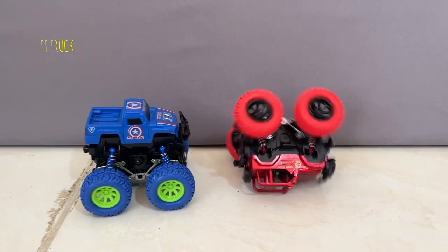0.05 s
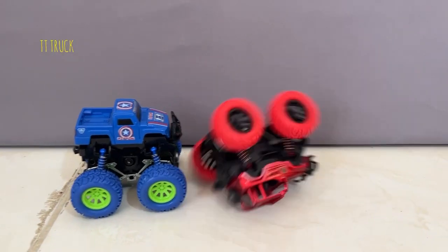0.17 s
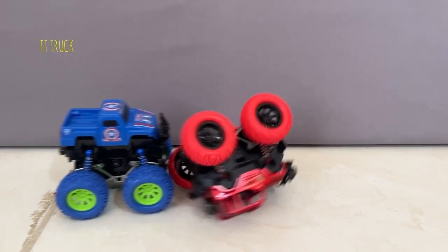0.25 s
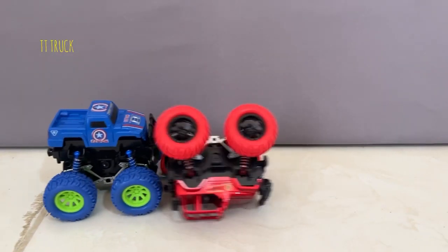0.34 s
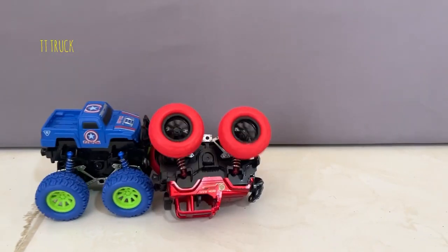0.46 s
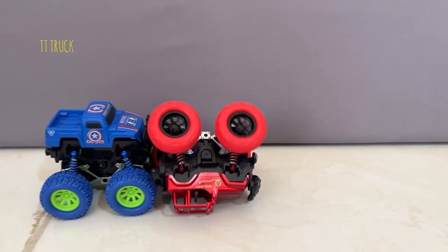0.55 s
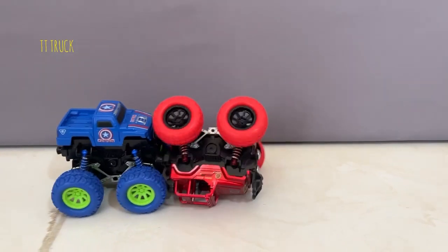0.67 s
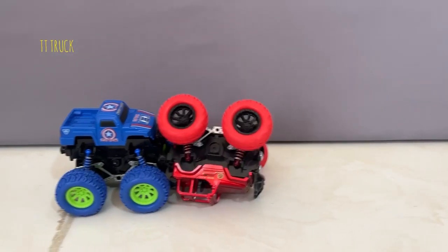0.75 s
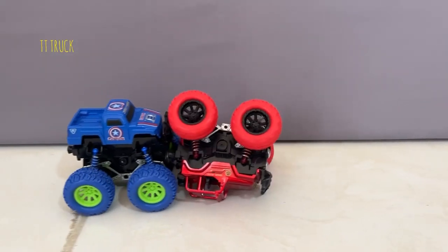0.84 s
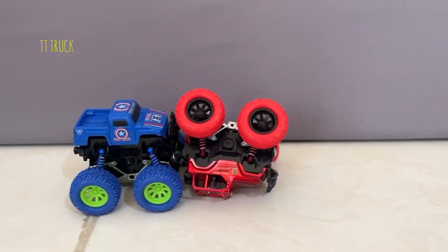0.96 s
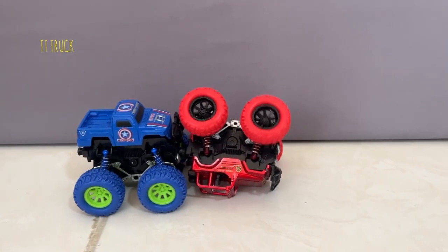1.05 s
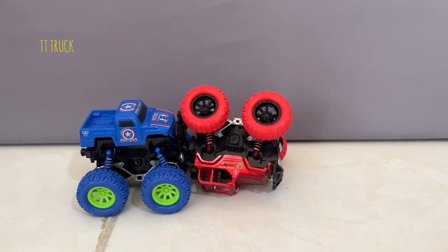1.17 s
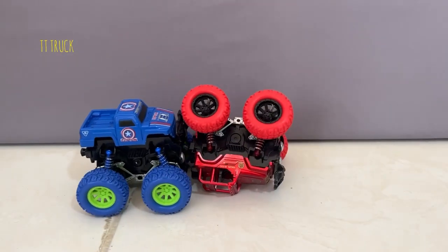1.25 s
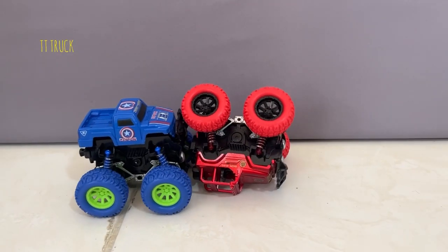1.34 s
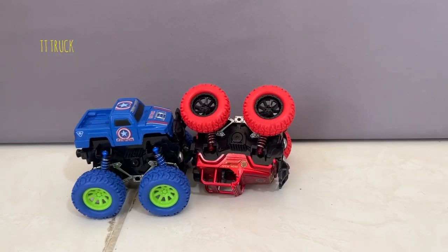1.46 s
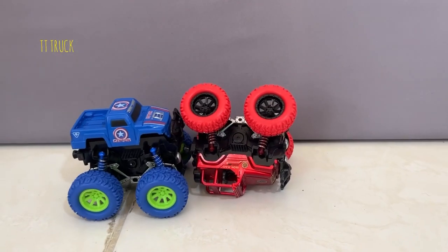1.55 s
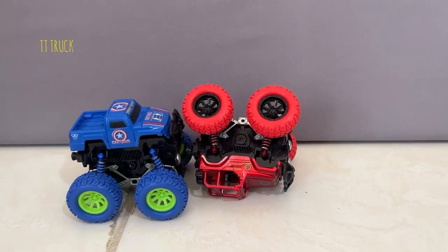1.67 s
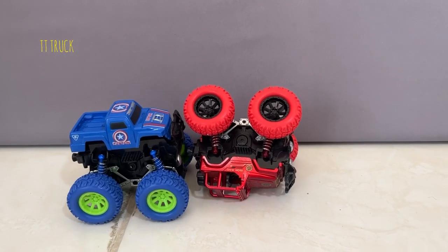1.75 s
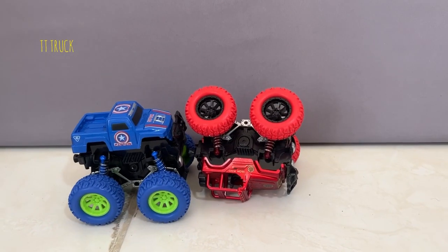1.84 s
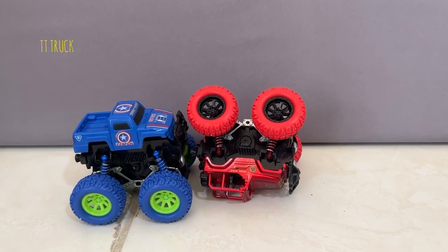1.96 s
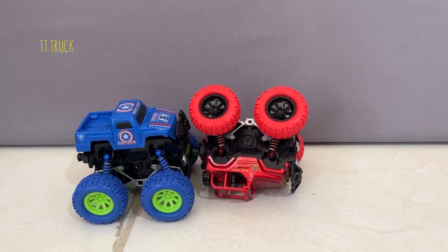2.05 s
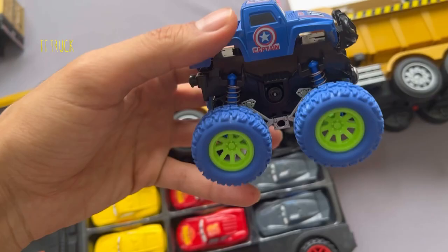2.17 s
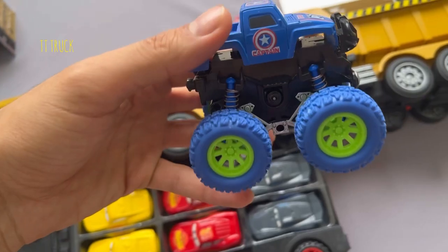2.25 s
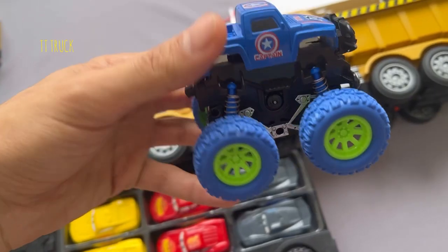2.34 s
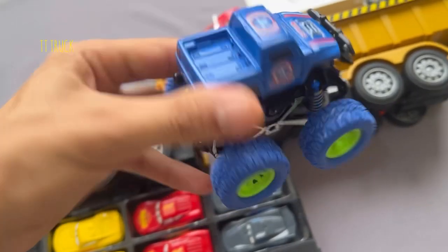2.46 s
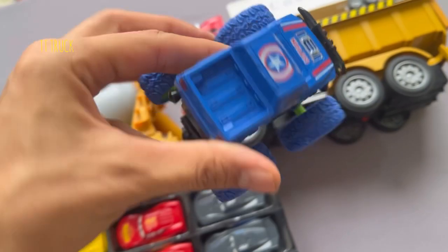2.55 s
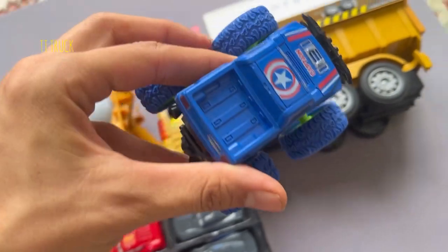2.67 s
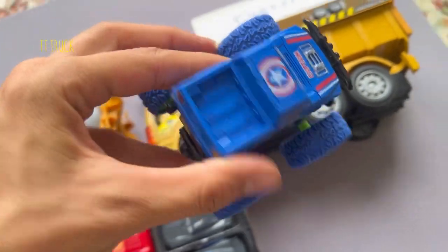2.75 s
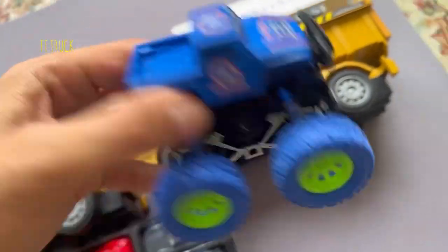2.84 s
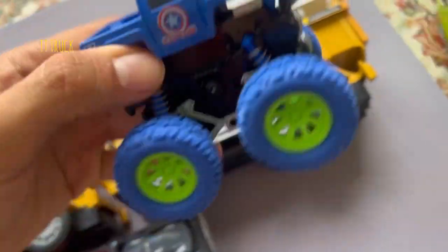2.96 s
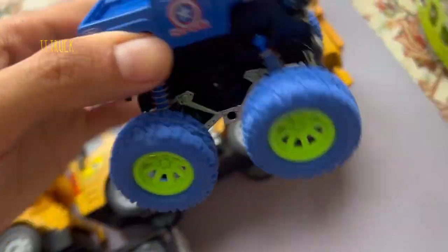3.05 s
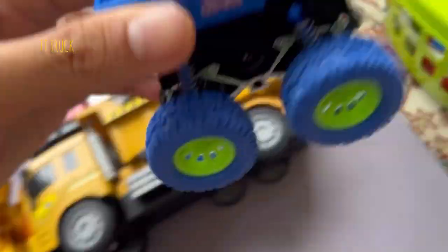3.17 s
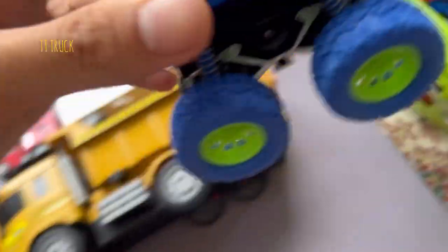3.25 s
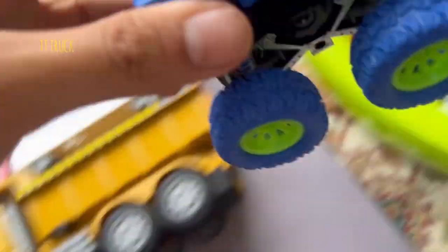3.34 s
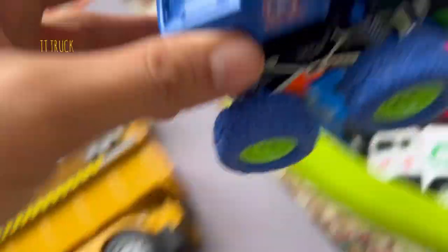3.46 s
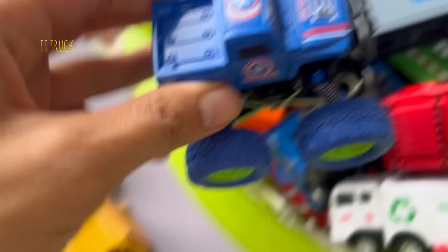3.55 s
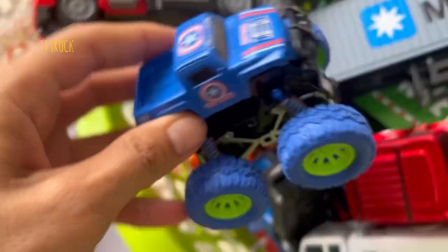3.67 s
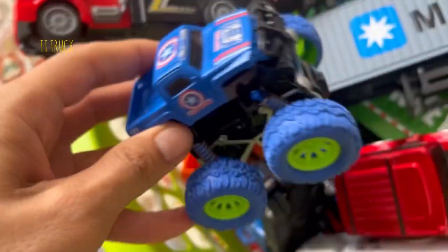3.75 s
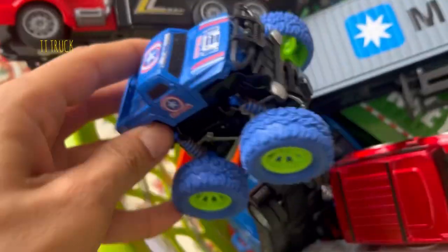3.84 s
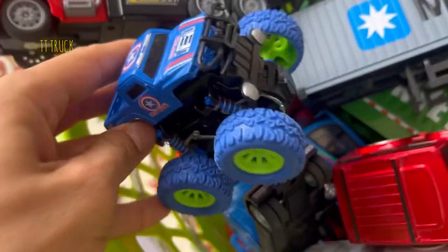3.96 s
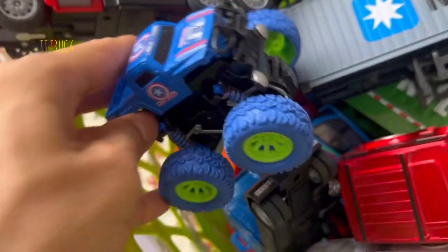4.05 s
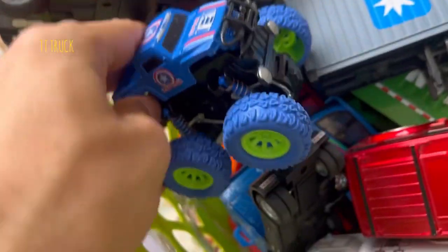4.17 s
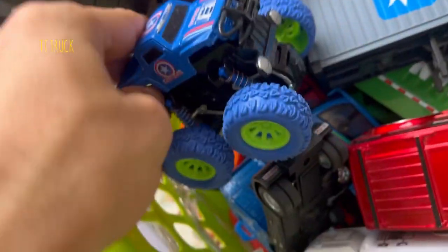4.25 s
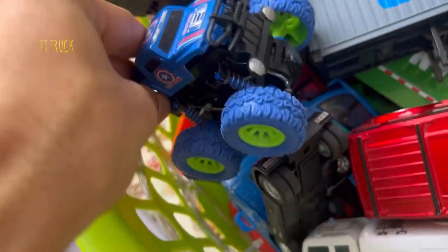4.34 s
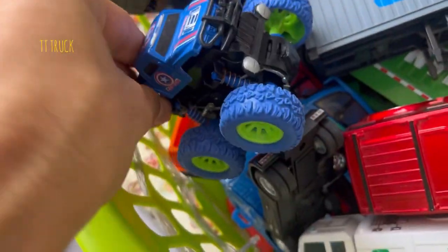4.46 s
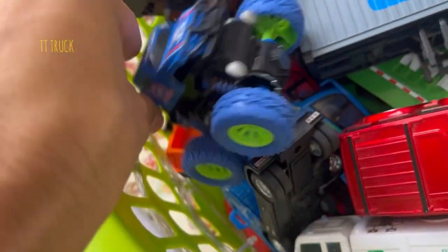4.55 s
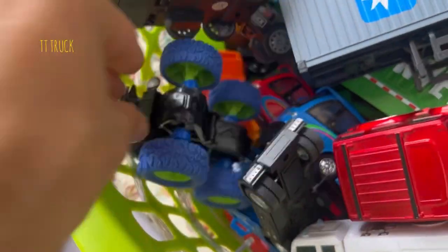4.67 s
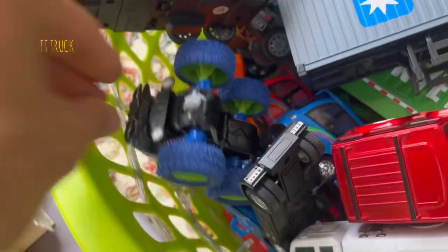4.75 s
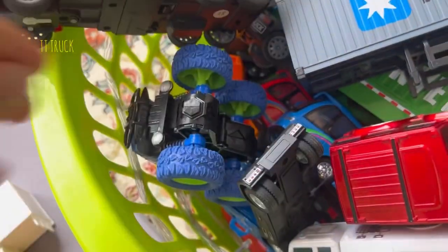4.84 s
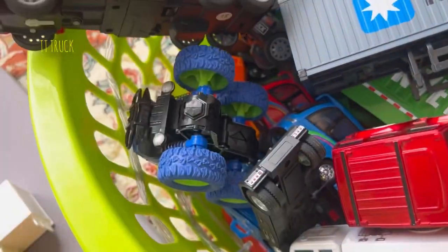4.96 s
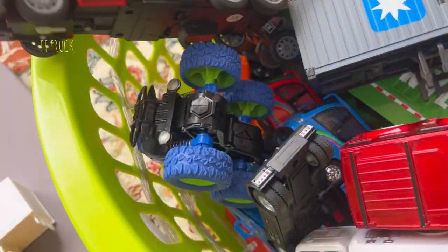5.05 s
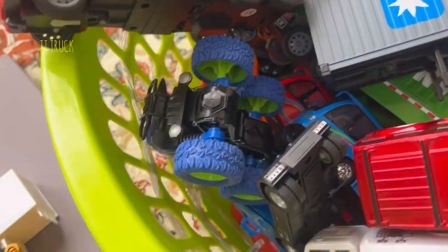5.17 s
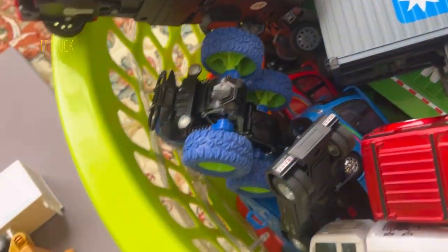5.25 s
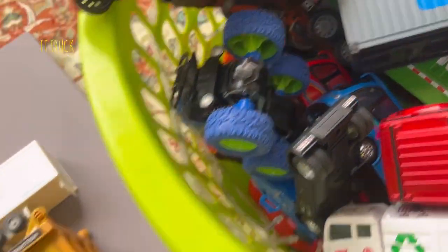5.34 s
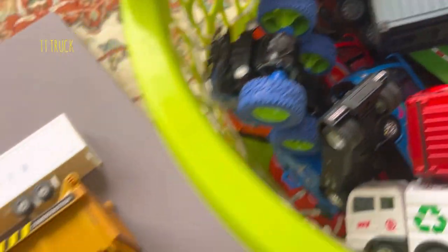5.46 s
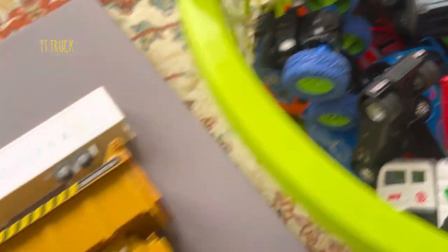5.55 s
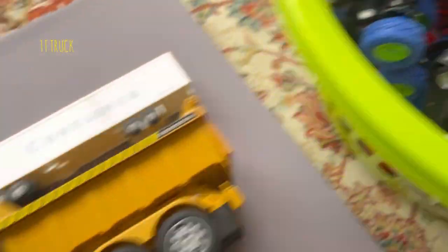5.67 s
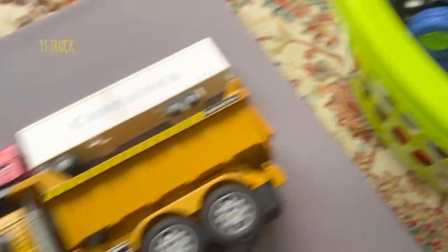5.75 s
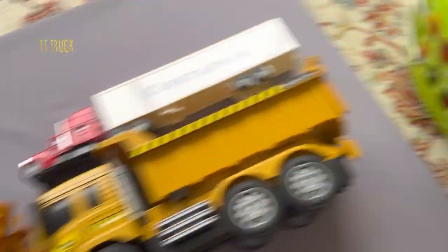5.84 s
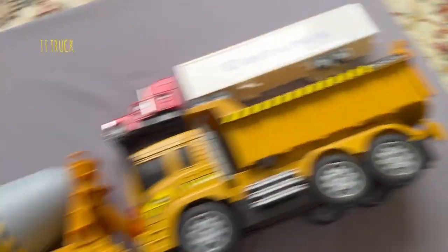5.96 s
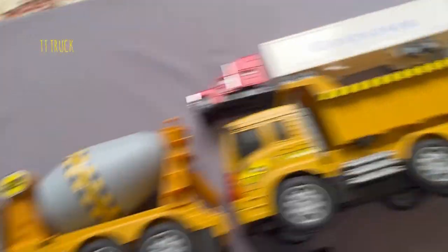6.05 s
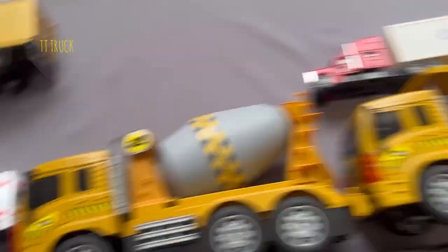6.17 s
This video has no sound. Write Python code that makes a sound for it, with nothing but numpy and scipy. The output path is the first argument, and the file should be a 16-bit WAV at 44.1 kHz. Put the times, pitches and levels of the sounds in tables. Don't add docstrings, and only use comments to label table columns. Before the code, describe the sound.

Close up in a humming tiled room, a plastic toy car lands hard on its roof, knocks about and rattles with loose flywheel gears that slow into tiny ticks. Abruptly the background becomes quieter; a hand rubs and clicks another toy car, then drops it with a hollow double clatter into a basket of toys.

```python
import sys
import numpy as np
from scipy import signal
from scipy.fft import rfft, irfft
from scipy.io import wavfile

SR = 44100
rng = np.random.default_rng(int(sys.argv[2]) if len(sys.argv) > 2 else 0)


def volts(x):
    e = np.asarray(x, float) / 20
    return 10 ** e


def dump_mix(stems):
    frames = np.atleast_2d(stems).T
    limited = np.clip(frames, -1, 1)
    pcm = np.round(limited * 32767).astype(np.int16)
    wavfile.write(sys.argv[1], SR, pcm)


N = 273772


def rms_one(x):
    return x / np.sqrt(np.mean(x ** 2) + 1e-20)


def in_time(rows):
    s, *columns = np.transpose(rows)
    t = np.arange(N) / SR
    opening = (t - s[0] + 0.012) / .003
    closing = (s[-1] + 0.035 - t) / .02
    gate = np.clip(np.minimum(opening, closing), 0, 1)
    nearer = np.minimum(t - s[0] + 0.012, s[-1] + 0.035 - t)
    gate = np.clip(nearer / [[.003], [.02]], 0, 1).min(axis=0)
    return [np.interp(t, s, c) for c in columns] + [gate]


def at_hz(points, hz, order=1):
    table = np.array(points)
    return np.interp(np.log(hz + 1), np.log(table[:, 0]), table[:, order])


def drift(rate_hz):
    r = np.exp(-64 * np.pi * rate_hz / SR)
    slow = signal.lfilter([1], [1, -2 * r, r * r], rng.standard_normal(N // 32 + 1002))[1000:]
    return np.interp(np.arange(N) / 32, np.arange(len(slow)), rms_one(slow))


def resonate(x, peaks, patchy_db=0):
    out = 0
    for k, (hz, width_hz, db) in enumerate(peaks):
        r = np.exp(-np.pi * width_hz / SR)
        if patchy_db:
            db = db + patchy_db * drift(27)
        zeros = [(1 - r * r) / 2, 0, (r * r - 1) / 2]
        poles = [1, -2 * r * np.cos(2 * np.pi * hz / SR), r * r]
        out = out + (-1) ** k * signal.lfilter(zeros, poles, x * volts(db) + 1e-18)
    return out


def band(x, low_hz, high_hz):
    return signal.sosfilt(signal.butter(2, [low_hz, high_hz], "band", fs=SR, output="sos"), x)


def grains(per_s, spread_db):
    chance, size, sign = rng.random((3, N))
    size_db = spread_db * np.minimum(-np.log(size + 1e-9), 3.0)
    return (chance < per_s / SR) * volts(size_db) * np.sign(sign - .5)


def gears():
    # time_s, level_db, lower_shell_db
    shake = [(0.0, -39, -4), (.08, -40, -4), (.095, -30, -5), (.2, -34, -5), (.272, -38, -4),
             (.302, -27, 2), (.33, -33, 1), (.39, -31, 3), (.5, -32, 2), (.64, -34, 1), (.77, -33, 0),
             (.97, -38.5, 0), (1.05, -43, -3), (1.15, -45, -4), (1.22, -49, -8), (1.32, -55, -8),
             (1.4, -63, -6), (1.54, -76, -4)]
    # catch_again_s, lifted_for_s, change_db
    slips = [(0.086, 0.024, -6.5), (0.359, 0.048, -5.5), (.43, 0.053, -2.5), (.488, 0.014, -2.5),
             (0.538, 0.024, -12), (0.579, 0.021, -2.5), (.618, .015, -1.5), (.714, 0.054, -11),
             (0.756, 0.029, -4.5), (.822, .015, -4), (0.869, 0.033, -9), (.935, 0.012, -3),
             (1.017, 0.03, -1.5), (1.055, 0.02, -1.5), (1.109, 0.027, 1), (1.19, 0.028, 0.5),
             (1.247, .015, 0)]
    # pitch_hz, width_hz, level_db
    cabin_peaks = [(563, 680, -8), (1070, 220, 0.5), (1398, 220, -4)]
    body_peaks = [(1830, 300, -3.5), (2150, 340, -0.5)]
    upper_peaks = [(2440, 200, -2), (2790, 190, 1.5), (2920, 190, -1), (3730, 1200, -9.5)]
    bright_peaks = [(4300, 730, 0.5), (5500, 320, -7), (6390, 820, 3.5), (8950, 11000, -6),
                    (10850, 2900, -2), (11900, 2700, -1), (15800, 900, -10)]
    shake_db, lower_db, gate = in_time(shake)
    t, lost_db = np.arange(N) / SR, 0
    for s, lifted, db in slips:
        corners = [s - 0.97 * lifted, s - 0.5 * lifted, s - .003, s]
        lost_db = lost_db + np.interp(t, corners, [0, db, db, 0])
    clumps = volts(1.1 * drift(90))
    rattle = clumps * grains(1500, 2.6)
    cabin = rms_one(resonate(rattle, cabin_peaks, patchy_db=2.5))
    body = rms_one(resonate(rattle, body_peaks, patchy_db=1.4))
    upper = rms_one(resonate(rattle, upper_peaks, patchy_db=1.15))
    bright = rms_one(resonate(clumps * grains(3000, 1.5), bright_peaks, patchy_db=2.15))
    jolt_db = np.maximum(shake_db + 28.5, 0)
    bright_db = 6 - 6.5 * t - 0.94 * jolt_db + 0.44 * lost_db
    shells = volts(-9) * cabin + volts(lower_db) * body + volts(-1.5 - 0.6 * lower_db) * upper
    return gate * volts(shake_db + lost_db) * (shells + volts(bright_db) * bright)


def dying_noise(t60, count, size):
    t = np.arange(size) / SR
    fading = rng.standard_normal((count, 2, size)) * volts(-60 * t / t60) * (t > .0005)
    tail = band(fading, 590, 6550)
    return tail / np.sqrt(np.sum(tail ** 2, axis=-1, keepdims=True))


def room(x):
    hop = 4096
    count = N // hop + 2
    padded, near = np.pad(x, (hop, 3 * hop)), np.zeros((2, (count + 3) * hop))
    window = np.sin(np.pi * np.arange(2 * hop) / (2 * hop))
    for k, echo in enumerate(dying_noise(0.011, count=count, size=hop // 2)):
        piece = padded[k * hop:][:2 * hop] * window
        near[:, k * hop:][:, :5 * hop // 2 - 1] += signal.fftconvolve(piece[None], echo, axes=1)
    walls = signal.fftconvolve(x[None], dying_noise(0.25, count=1, size=SR // 2)[0], axes=1)
    return volts(-9) * near[:, hop:hop + N] + volts(-11.5) * walls[:, :N]


def room_tone(spectrum):
    # pitch_hz, likeness (0-1)
    port_likeness = [(60, 0.97), (300, .85), (700, 0.01), (1500, 0.3), (3500, .5), (6000, 0), (9000, 1),
                     (15000, 1)]
    hz = np.fft.rfftfreq(N, 1 / SR)
    mid, side = rfft(rng.standard_normal((2, N))) * volts(at_hz(spectrum, hz))
    alike = np.clip(at_hz(port_likeness, hz), 0, 1)
    both = np.sqrt(1 + alike) * mid + np.sqrt(1 - alike) * side * [[1], [-1]]
    share = 1 / (1 + (hz / 220) ** 4)
    low, rest = irfft(both * share, N), irfft(both * (1 - share), N)
    return np.array([low, rest]) / np.std(low + rest)


def backgrounds():
    # pitch_hz, level_db (per Hz)
    tiled_spectrum = [(25, -25.5), (48, 6.5), (100, -2), (250, -4.5), (480, -18.5), (750, -31), (1400, -33),
                      (2100, -30.5), (3300, -36), (4700, -44), (6400, -35.5), (7500, -48), (10000, -53.5),
                      (15000, -51)]
    soft_spectrum = [(25, -18), (42, -12), (57, 10), (75, -3.5), (115, -4.5), (250, -21), (500, -28),
                     (1200, -36), (2000, -29), (3500, -32), (7000, -41), (9800, -45.5), (11500, -38),
                     (15500, -49.5)]
    # time_s, level_db above the
    stir = [(2.29, -2.5), (2.7, 0), (3.2, 6.5), (3.6, 1.5), (4.05, 0.5), (4.3, 10), (4.4, 4.5), (4.6, 2),
            (4.67, 22.5), (4.76, 8.5), (4.92, 4), (5.07, 6.5), (5.4, -1.5), (5.47, -1.5), (5.7, 0.5),
            (6.21, 1)]
    scene_change_s = 2.286
    hiss_hz, hiss_width_hz, hiss_db = 15680, 130, -87.5
    tiled = volts(-46.5) * room_tone(tiled_spectrum).sum(axis=0)
    white = rng.standard_normal((2, N))
    hiss = band(white, hiss_hz - hiss_width_hz / 2, hiss_hz + hiss_width_hz / 2)
    tiled = tiled + volts(hiss_db) * rms_one(hiss)
    low, rest = room_tone(soft_spectrum)
    stir_db, _ = in_time(stir)
    soft = volts(-63.5 + 0.98 * stir_db) * low + volts(-60 + stir_db) * rest
    return np.where(np.arange(N) < scene_change_s * SR, tiled, soft)


def thuds(blows, modes):
    out = np.zeros(N)
    for s, blow_db in blows:
        at = round(s * SR)
        t = np.arange(N - at)[:SR] / SR
        for hz, db, t60 in modes:
            out[at:][:SR] += volts(blow_db + db - 60 * t / t60) * np.sin(2 * np.pi * hz * t)
    return out


def snaps():
    # start_s, peak_db, pitch_hz, die_away_s (by 60 dB)
    touches = [(.009, -22.5, 2450, 0.017), (0.045, -20, 2700, .012), (.091, -21.5, 240, 0.045),
               (0.36, -18, 2300, .006), (.365, -18.5, 7100, .005), (0.38, -17.5, 3300, .006),
               (.452, -21.5, 1900, .006), (0.5, -20, 2300, 0.012), (.5405, -18.5, 2300, 0.018),
               (2.4373, -53, 1770, 0.027), (2.866, -46, 1500, 0.12), (3.1313, -33, 2100, 0.015),
               (3.154, -24, 3300, 0.0034), (3.6949, -47, 2330, 0.021), (3.6965, -35, 4500, .005),
               (3.6972, -44, 2000, 0.0071), (3.6966, -37.5, 7000, .004), (4.568, -42, 870, .03),
               (5.081, -43, 1000, .02), (2.905, -55, 530, .03), (2.3, -48.5, 2480, .015),
               (2.438, -49, 2800, 0.0046), (4.3, -38, 2600, .05), (4.191, -46, 5000, .01),
               (3.262, -55, 800, .04), (3.018, -48, 1900, .012), (3.033, -48, 2100, .012),
               (3.047, -50, 2000, .012), (3.003, -52, 1800, .012), (0.869, -22, 4500, .008),
               (4.632, -19.5, 1600, 0.013), (4.671, -24.5, 305, .06), (4.6837, -29.5, 410, 0.057),
               (4.744, -40, 370, .06), (4.7745, -41.5, 360, .06), (5.012, -42, 680, .025),
               (5.018, -42.5, 900, .035), (5.069, -46, 300, 0.064), (5.1095, -34, 1110, 0.013)]
    return sum(thuds([(s, db)], [(hz, 0, t60)]) for s, db, hz, t60 in touches)


def knocks(events, t60, hollow_db, ring_db, crack_db, rise):
    size = 4096
    out, t = np.zeros(N + size), np.arange(size) / SR

    def fade(time):
        return (1 - np.exp(-t / (rise * t60))) * volts(-60 * t / max(time, .003))

    noise = rng.standard_normal((len(events), 4, size))
    for (s, db, hz, high_db), white in zip(events, noise):
        hollow = band(white[0] * fade(2.8 * t60), 210, 1550)
        middle = band(white[1] * fade(t60), 1500, 4500)
        high = band(white[2] * fade(0.61 * t60), 6800, 16000)
        ring = resonate(white[3] * fade(.7 * t60), [(hz, 4e-5 * hz ** 2 + 220, 0)])
        crack = band(white[1] * volts(-60 * t / 0.001), 1900, 12000)
        gains = volts([hollow_db + 0.1 * high_db, -5, high_db, ring_db, crack_db + 3 * high_db])
        parts = [hollow, middle, high, ring, crack]
        at = round(s * SR)
        out[at:at + size] += volts(db) * sum(g * p / np.abs(p).max() for g, p in zip(gains, parts))
    return out[:N]


def tumbling():
    # start_s, peak_db, ring_hz, high_part_db (hardness)
    tumble_hits = [(.027, -22.5, 2330, -13.5), (.04, -22.5, 4300, -14), (.061, -16, 2460, -9.5),
                   (.0862, -7.5, 3040, 1), (.09, -13, 1088, -23.5), (.101, -12.5, 3050, -17),
                   (.133, -14, 1275, -10.5), (.296, -14.5, 2120, 3), (.303, -20.5, 2240, -12),
                   (.36, -19.5, 2300, 5), (.384, -17, 2150, -11), (.458, -21.5, 2475, -18),
                   (.494, -15.5, 2440, -7.5), (.539, -17, 2200, -13), (.686, -24.5, 2150, -14.5),
                   (.722, -18, 2330, -13.5), (.757, -21.5, 2334, -24), (.775, -19, 1050, -2.5),
                   (.87, -20, 1972, -2), (.949, -32, 1053, -11), (1.017, -31, 2600, 1),
                   (1.055, -29, 2230, -27), (1.119, -30, 2550, -25), (1.146, -35, 2470, -31),
                   (1.247, -30, 2780, -24)]
    return knocks(tumble_hits, t60=.025, hollow_db=-15, ring_db=-4.5, crack_db=-11, rise=0.019)


def landing():
    # start_s, level_db
    floor_blows = [
        (.0865, -19.5),
    ]
    # pitch_hz, level_db, die_away_s (by 60 dB)
    floor_modes = [(77.14, -3.5, 0.49), (133.2, -8, 0.65), (159, -3.5, 0.11), (193, 3, 0.18),
                   (264, -8, 0.27), (307, -16.5, 0.5)]
    return band(thuds(floor_blows, floor_modes), 52, 3000)


def ratchet():
    # start_s, peak_db
    tooth_ticks = [(1.3114, -40), (1.3264, -41), (1.3404, -38), (1.3564, -42), (1.3724, -43), (1.3877, -43),
                   (1.4034, -42), (1.4192, -43), (1.4351, -42), (1.4506, -39), (1.4666, -40), (1.484, -43),
                   (1.5005, -44), (1.5174, -44), (1.5369, -49), (1.5554, -48), (1.5758, -47), (1.5963, -46),
                   (1.6194, -56), (1.6437, -57), (1.6746, -56)]
    # pitch_hz, width_hz, level_db
    tooth_peaks = [(2050, 420, -2), (2720, 450, 0), (4400, 600, -7), (6500, 1200, -13)]

    def ring(x):
        return sum(resonate(resonate(x, [peak]), [peak]) * (-1) ** k for k, peak in enumerate(tooth_peaks))

    teeth = np.zeros(N)
    for s, db in tooth_ticks:
        touches = np.array([1, *rng.uniform(-.6, .6, 2)])
        teeth[round(s * SR) + np.array([0, 45, 110])] = volts(db) * touches
    one_tick = ring(np.eye(1, 512)[0])
    return ring(teeth) / np.abs(one_tick).max()


def rubbing():
    # start_s, length_s, level_db, dull_db, bright_db (both above level_db)
    strokes = [(2.415, 0.093, -69.5, -22, -10.5), (2.54, 0.032, -67.5, -13, -15),
               (2.775, 0.032, -66, -15, -20), (2.823, 0.053, -63, -11, 4), (2.942, 0.17, -60, -18, -4),
               (3.24, 0.2, -65, -1, 2.5), (4.111, 0.033, -63.5, 18.5, -24), (4.185, 0.043, -70.5, 13.5, -7),
               (4.27, 0.032, -57, -1.5, 1.5), (4.4, 0.1206, -70.5, -14, -4), (4.535, 0.1, -66, 11, 2.5),
               (5.005, 0.04, -66, 10, -10)]
    settles = [
        (2.6, 0.32, -70, -6, -5.5),
        (3.8, 0.092, -70, -14, 3),
        (4.31, 0.052, -49.5, 5, -6),
        (4.69, 0.15, -41, 3.5, 1.5),
        (5.07, 0.13, -55.5, 3.5, -19),
    ]
    # pitch_hz, width_hz, level_db
    rub_peaks = [(1500, 550, -1.5), (2300, 480, 2), (3233, 370, -1)]
    dull_peaks = [(356, 250, -4.5), (746, 680, -6.5), (1100, 270, -5)]
    bright_peaks = [(5600, 1400, 2), (6600, 1200, 3), (7630, 660, 1.5), (10050, 1800, -1),
                    (13100, 4800, -7)]
    flutter = volts(0.66 * drift(61))
    slips = rms_one(resonate(flutter * grains(2200, 3.6), rub_peaks, patchy_db=4.0))
    dull = rms_one(resonate(grains(2000, 2.1), dull_peaks, patchy_db=1.0))
    bright = rms_one(resonate(flutter * grains(7100, 2.1), bright_peaks, patchy_db=3.5))
    moves = [(*row, -2) for row in strokes] + [(*row, -27.5) for row in settles]
    out = 0
    for s, length, db, dull_db, bright_db, sag_db in moves:
        press_db, gate = in_time([(s, db), (s + length, db + sag_db)])
        mix = slips + volts(dull_db) * dull + volts(bright_db) * bright
        out = out + gate * volts(press_db - 2.5) * mix
    return out


def turning():
    # start_s, peak_db, ring_hz, high_part_db (hardness)
    turning_hits = [(2.4371, -46, 1720, -20), (2.55, -48.5, 2400, -28), (2.6542, -55, 2410, -35),
                    (2.7734, -51.5, 1796, -17), (2.829, -48, 1570, -4), (2.8425, -43, 1830, -14),
                    (2.8662, -36, 5600, -15), (2.937, -55, 5600, -13), (2.9724, -35.5, 6100, -10),
                    (3.0175, -44.5, 2020, -21), (3.1305, -42, 3000, -22), (3.1545, -35, 1500, 0),
                    (3.2594, -47.5, 831, -2), (3.5765, -47, 3800, -4), (3.6125, -53, 2120, -16),
                    (3.6475, -49, 5700, 0), (3.6965, -38.5, 2000, 2), (3.84, -58.5, 2250, -20),
                    (3.9523, -45, 2253, 0), (3.9636, -46.5, 1500, -6), (5.9294, -61, 2130, -0.5)]
    return knocks(turning_hits, t60=0.017, hollow_db=-28.0, ring_db=-4, crack_db=-10, rise=0.1)


def squeaks():
    # start_s, end_s, pitch_hz, width_hz, level_db
    squeak_events = [(2.855, 2.93, 5700, 400, -64), (2.935, 3.0, 5500, 900, -62),
                     (3.06, 3.12, 5300, 700, -62), (3.29, 3.5, 1175, 150, -72), (3.45, 3.6, 1190, 150, -77),
                     (3.36, 3.48, 2370, 200, -77), (3.64, 3.7, 1500, 150, -72), (2.65, 3.1, 450, 300, -72),
                     (5.93, 6.3, 400, 220, -76), (4.85, 5.09, 2420, 50, -76), (4.91, 4.99, 2420, 50, -74),
                     (4.95, 5.12, 4650, 180, -77), (5.9, 5.97, 6000, 2500, -80)]
    t, out = np.arange(N) / SR, 0
    for start, end, hz, width_hz, db in squeak_events:
        peak = [(hz, width_hz, 0)]
        line = resonate(resonate(rng.standard_normal(N), peak), peak)
        fade = np.interp(t, [start, start + 0.01, end - .045, end], [0, 1, 1, 0])
        out = out + volts(db) * rms_one(line) * fade
    return out


def lowering():
    # start_s, peak_db, ring_hz, high_part_db (hardness)
    lowering_hits = [(4.1037, -42, 1070, -26.5), (4.1344, -45, 1070, -24.5), (4.1833, -40.5, 5000, -2),
                     (4.2091, -44, 1109, -17), (4.2405, -42.5, 3160, 4), (4.2656, -32, 2970, 1.5),
                     (4.2986, -27.5, 1610, 6.5), (4.44, -55, 2038, -19), (4.4538, -54, 1930, -27.5),
                     (4.5371, -51.5, 990, 6.5), (4.568, -45, 970, -11.5), (4.592, -35, 1680, 6.5),
                     (4.737, -31.5, 1160, -7), (4.808, -41.5, 4100, -6), (5.0115, -49, 1900, -30),
                     (5.069, -39, 5140, -4), (5.0774, -33.5, 5030, -6.5), (5.109, -45, 2520, 1)]
    return knocks(lowering_hits, t60=0.02, hollow_db=-9.0, ring_db=-2, crack_db=-11.0, rise=0.099)


def basket():
    # start_s, level_db
    basket_blows = [
        (4.105, -52.5),
        (4.298, -44),
        (5.012, -58),
        (4.629, -34.5),
        (4.668, -31),
    ]
    # pitch_hz, level_db, die_away_s (by 60 dB)
    basket_modes = [(206.3, -9.5, 0.098), (379, -1, 0.081), (449, -10.5, 0.18), (863, -12, 0.21),
                    (978, -32, 0.22), (1090, -28, 0.45)]
    return band(thuds(basket_blows, basket_modes), 52, 3000)


def falling():
    # start_s, peak_db, ring_hz, high_part_db (hardness)
    falling_hits = [
        (4.6173, -24.5, 2030, -0.5),
        (4.6195, -17, 6500, -3.5),
        (4.6298, -15.5, 5930, -8),
        (4.6371, -21.5, 1180, -20),
        (4.6543, -24.5, 1786, -2),
        (4.6648, -14.5, 2820, 0.5),
        (4.6784, -14.5, 5900, -6.5),
        (4.6953, -33, 1760, 10.5),
    ]
    return knocks(falling_hits, t60=0.034, hollow_db=-9.0, ring_db=-2.0, crack_db=-14, rise=0.028)


def scene():
    toys = gears() + snaps() + tumbling() + landing() + ratchet()
    toys = toys + rubbing() + turning() + squeaks() + lowering() + basket() + falling()
    return toys + room(toys) + backgrounds()


def band_limit(x):
    return signal.sosfilt(signal.butter(12, 16510, fs=SR, output="sos"), x)


def record(dry):
    # pitch_hz, right_lead_radians, left_minus_right_db
    port_curve = [(20, 0, 1.5), (300, -.15, 1.2), (900, -.7, 5), (1900, .3, 1.5), (3700, -1.2, 4),
                  (5600, .1, 3), (7800, .5, 1), (8600, 1.2, 0), (9300, 3.05, 0), (10600, 3.2, 0),
                  (12600, 6.2, 0), (14200, 6.35, 0), (15500, 9.2, 0), (16500, 9.4, 0)]
    hz = np.fft.rfftfreq(N, 1 / SR)
    half = np.array([[.5], [-.5]])
    level = volts(half * at_hz(port_curve, hz, order=2))
    phase = np.exp(-1j * half * at_hz(port_curve, hz))
    heard = irfft(rfft(dry) * level * phase, N)
    rounded = 0.96 * np.tanh(heard / .95)
    top_cut = signal.cheby2(10, 45, 16030 * 1.03, fs=SR, output="sos")
    return band_limit(signal.sosfilt(top_cut, rounded))


dry = scene()
out = record(dry)
dump_mix(out)
```